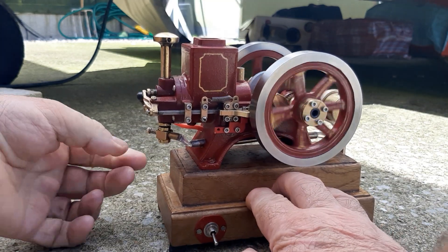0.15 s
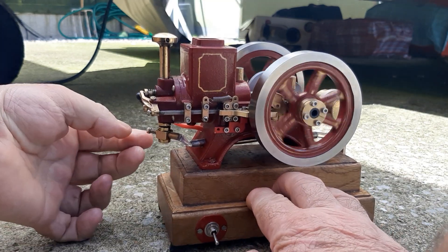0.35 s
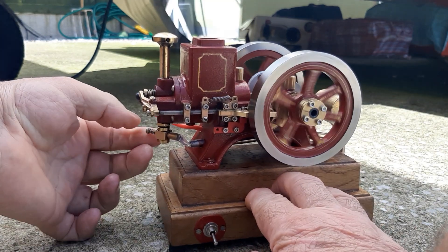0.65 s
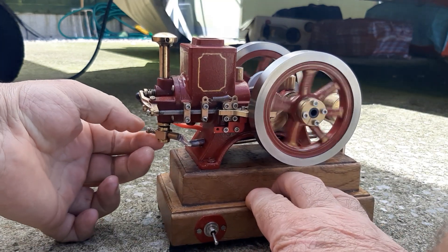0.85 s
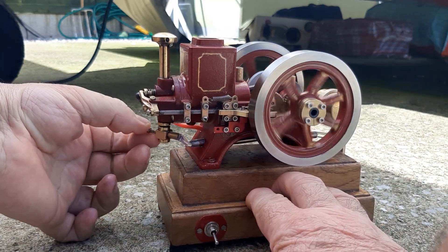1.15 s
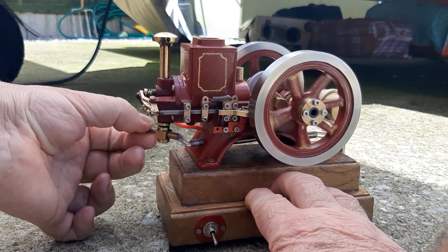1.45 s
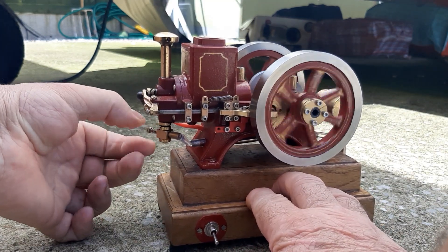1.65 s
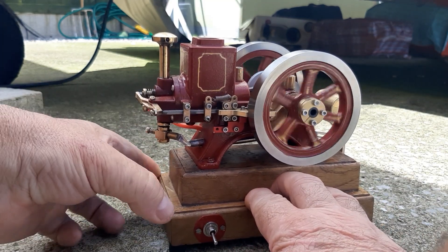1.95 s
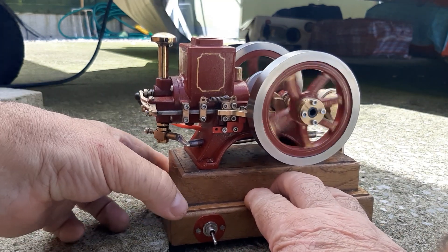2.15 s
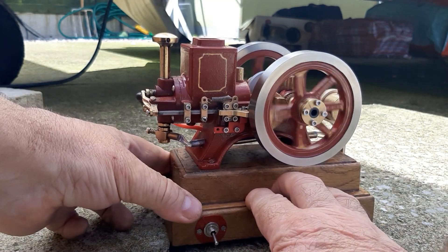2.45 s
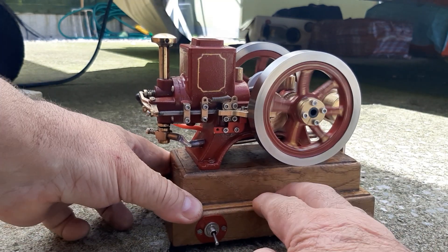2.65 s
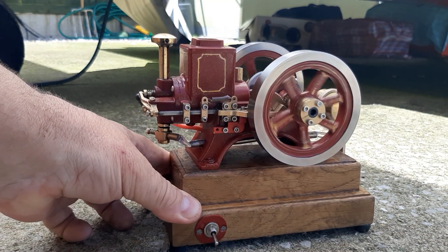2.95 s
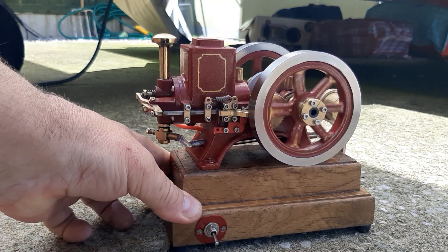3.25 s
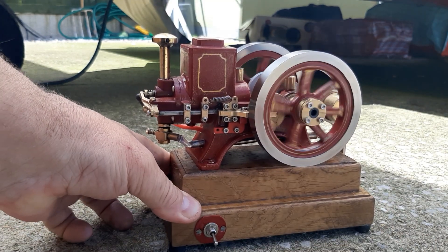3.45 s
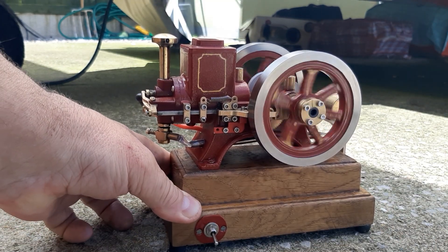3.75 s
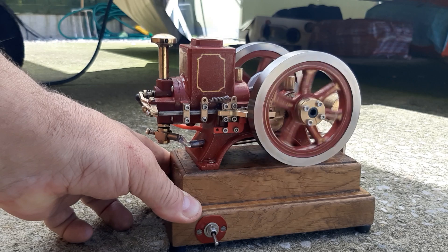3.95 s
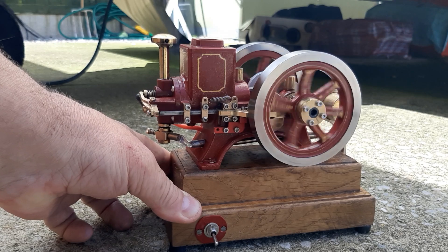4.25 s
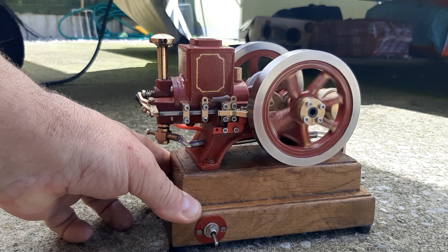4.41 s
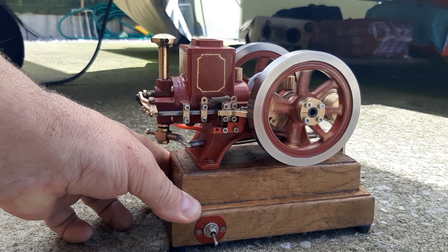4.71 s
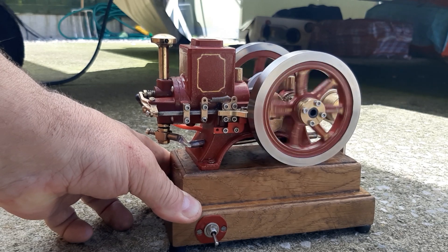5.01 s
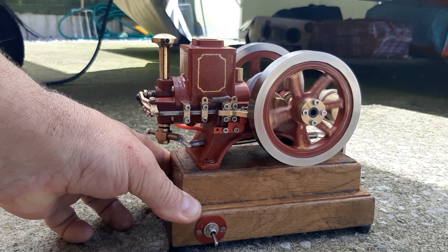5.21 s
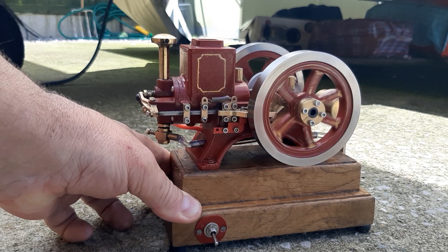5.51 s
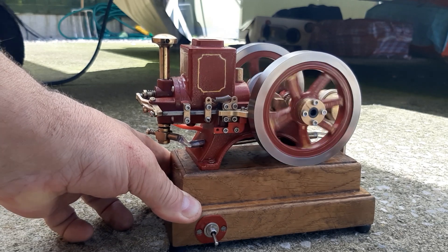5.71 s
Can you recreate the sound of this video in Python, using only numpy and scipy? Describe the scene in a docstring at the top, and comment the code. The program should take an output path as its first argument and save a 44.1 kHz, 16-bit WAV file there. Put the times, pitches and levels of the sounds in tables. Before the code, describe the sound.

A miniature single-cylinder petrol engine runs on a wooden box in a concrete yard, close to the microphone. Its valve gear ticks and clatters fast, with hoarse little puffs of air and a faint whirr. Five times it gulps air, fires two sharp pops and speeds up, then coasts and slows slightly. In the second half, gusts of wind rumble and bump on the microphone, mostly on the left.

```python
"""A concrete yard, a stereo microphone close to a miniature hit-and-miss petrol engine on a wooden box.
The engine coasts with its exhaust valve held open, ticking and puffing as the flywheels slow. Five
times it gulps air through a fluttering intake valve, fires twice and picks up speed. The box knocks
along and scrapes once on the concrete. A breeze buffets the microphone, mostly on the left."""
import sys
import numpy as np
from scipy import signal
from scipy.fft import rfft, irfft, next_fast_len
from scipy.io import wavfile
from scipy.ndimage import uniform_filter1d, map_coordinates

SR = 44100
rng = np.random.default_rng(int(sys.argv[2]) if len(sys.argv) > 2 else 0)


def waveform_to_disk(signal):
    """Save audio, clipped to [-1, 1], as 16-bit WAV at the path in sys.argv[1]."""
    frames = np.transpose(np.atleast_2d(signal))
    scaled = np.clip(frames, -1, 1) * 32767
    samples = np.round(scaled).astype(np.int16)
    wavfile.write(sys.argv[1], SR, samples)


N = 258993
TIME = np.arange(N) / SR
AGE = np.arange(SR // 8) / SR  # seconds since a blow

# Firings. Each row: exhaust opening in seconds, level in dB, new speed in cam cycles a second.
FIRINGS = [(0.7164, -14.5, 9.01), (0.8293, -14.5, 10.586), (2.0989, -16, 8.8), (2.2134, -14, 10.525),
           (3.3698, -16, 8.1), (3.492, -14, 10.044), (4.2824, -14.5, 9.69), (4.4944, -13.5, 10.805),
           (5.7241, -15.5, 9.6), (5.8325, -13.5, 10.96)]
# Openings of the intake valve. Each row: start in seconds, snap level in dB, gulp level in dB.
INTAKES = [(0.5567, -12, -20.5), (0.624, -19, -20.5), (0.7537, -17.5, -20), (2.0056, -5.5, -19),
           (2.1371, -15, -18.5), (3.2698, -9.5, -20.5), (3.4113, -17.5, -20.5), (4.2019, -6.5, -19.5),
           (4.3718, -11.5, -18), (4.4261, -14.5, -20), (5.6505, -12.5, -24.5), (5.7672, -10.5, -20.5)]
# The engine frame's modes. Each row: pitch in Hz, level in dB, time to fall 60 dB in seconds.
FRAME_MODES = [(469, -18.5, 0.044), (735, -10, 0.046), (844, -7, 0.031), (1135.4, -5, 0.074),
               (1228, -8, 0.067), (1560.5, 0, 0.047), (1659, 1, 0.044), (1744, 2, 0.031), (2023, -4, 0.048),
               (2924, -17, 0.036), (3520, -10, 0.069), (3815, -3.5, 0.04), (4550, -9, 0.058)]


def exhaust(pop_db=6, jet_db=-1, thump_db=-3, thump_hz=145, boom_db=-15, silencer_db=-6, burn_db=-19):
    """The charge burns and strains the frame; the valve lifts, the port pops, the gas roars and thumps."""
    # The silencer's modes. Each row: pitch in Hz, level in dB, ring time in seconds.
    silencer_modes = [(1550, 4, 0.03), (2060, -14, .014), (3040, 4, 0.013), (3960, -2, 0.0082),
                      (7610, -5.5, 0.062), (12900, -26, .02)]
    # The bright jet and its low boom. Each row: frequency in Hz, level in dB.
    jet_spectrum = [(100, -7), (400, 7.5), (900, -42), (1600, 7), (2800, 4), (4300, 3.5), (6000, -1.5),
                    (7500, 1.5), (8700, -7.5), (10500, -4), (13000, 0), (16000, -1.5)]
    boom_spectrum = [(40, -16), (90, -20), (200, -21), (380, 16), (550, -2), (750, 7), (1100, 10),
                     (1600, 3.5), (2200, -56), (5000, -52)]
    tone, jet, boom = np.zeros((3, N))
    for s, db, _ in FIRINGS:
        burn_s, lift_s = s - .02, s + .000738
        add(tone, burn_s, amp(db + burn_db) * ring(FRAME_MODES, rise=.0062))
        pop = amp(pop_db) * chirp(start_hz=1850, end_hz=1700, glide_s=.004) * fade(t60=.013, rise=.00004)
        thump = -amp(thump_db) * np.sin(2 * np.pi * thump_hz * AGE) * swell(peak=.0033, steep=3.05)
        silencer = amp(silencer_db) * ring(silencer_modes, rise=.00077)
        add(tone, lift_s, amp(db) * (pop + thump + silencer))
        add(jet, lift_s, amp(db + jet_db) * (swell(peak=.0026, steep=4) + .16 * fade(t60=.06, rise=.003)))
        add(boom, lift_s, amp(db + boom_db) * fade(t60=.087, rise=.0041))
    return tone + jet * noise(jet_spectrum) + boom * noise(boom_spectrum)


def intake(flutter_s=.0084, bounces=3, step_db=-2, snap_db=3, hiss_db=-6, push_hz=170, throat_db=3):
    """The spring-loaded valve snaps open, then flutters: a gulp at each bounce, a hiss in between."""
    # The valve's snap and the air hissing past it. Each row: frequency in Hz, level in dB.
    snap_spectrum = [(200, -6.5), (800, 2), (2000, -2.5), (4000, 0), (7500, -0.5), (8700, -4), (11000, 4.5),
                     (12700, 9), (16000, 1)]
    hiss_spectrum = [(200, 6), (800, 6), (2000, -3), (4000, -0.5), (7500, -0.5), (8700, -4.5), (10500, -4),
                     (12700, 7.5), (16000, 4)]
    tone, hiss, snap = np.zeros((3, N))
    push = amp(-4) * np.sin(2 * np.pi * push_hz * AGE) * fade(t60=.028, rise=.0002)
    for s, db, gulp_db in INTAKES:
        add(snap, s, amp(db + snap_db) * fade(t60=.014, rise=.00078))
        add(tone, s, amp(gulp_db) * push)
        for k in range(bounces):
            bounce_s = s + .0065 + k * flutter_s + rng.normal(0, .00015)
            size = amp(gulp_db + k * step_db)
            throat = chirp(start_hz=1500, end_hz=1950, glide_s=.0012) * fade(t60=.013, rise=.0001)
            add(tone, bounce_s, -size * (amp(throat_db) * throat + push))
            if k < bounces - 1:
                add(hiss, bounce_s, size * amp(hiss_db) * swell(peak=.0043, steep=1.45))
    return tone + hiss * noise(hiss_spectrum) + snap * noise(snap_spectrum)


def valve_gear(angle, cycles, held, loaded_db=-10):
    """Pushrod, latch and timing gears knock at fixed cam angles, ringing the frame and a small spring."""
    # Knocks in every cycle. Each row: share of the cycle, then click, frame and gear levels in dB.
    contacts = [(.028, -9, -4, -5), (.315, -10, -12, -30), (.517, -6, -8, 0), (.545, -14, -1, -10),
                (.778, 1, 0, -14), (.818, -3, -4, -22), (.985, -5, -6, -18)]
    # Gear and spring modes. Each row: pitch in Hz, level in dB, ring time in seconds.
    gear_modes = [(1687, 1.5, 0.049), (2471, 8, 0.029), (2520, -12, .02), (5510, 7.5, 0.017),
                  (7580, -1, 0.052), (7870, 4.5, 0.016)]
    spring_modes = [(11380, 5, 0.01), (11580, -1, 0.018), (12560, -18, .02)]
    # The spring's loudest pings. Each row: start in seconds, level in dB.
    pings = [(2.049, -26), (2.1864, -32), (3.1662, -26.5), (4.2418, -26), (5.682, -31)]
    # The click of metal on metal. Each row: frequency in Hz, level in dB.
    click_spectrum = [(200, -45), (500, -9.5), (800, -34), (2500, 0.5), (4500, -2), (6000, 2.5), (7600, 5),
                      (8700, -12), (10500, 0), (12600, 5), (14000, -5), (16000, -2.5)]
    clicks, metal = np.zeros((2, N))
    click = fade(t60=.0095, rise=.00015) + amp(-17) * fade(t60=.055, rise=.002)
    for cycle, (s, tick_db, clatter_db) in enumerate(cycles):
        # the pushrod ticks and bounces once
        add(clicks, s, amp(tick_db - 1) * click)
        bounce_s = s + .0049 * rng.uniform(.49, 1.69)
        add(clicks, bounce_s, amp(tick_db - 12 + rng.normal(0, 2)) * fade(t60=.014, rise=.000086))
        add(metal, s, amp(clatter_db + 3) * ring(FRAME_MODES, rise=.006))
        *_, spring_db, _ = drift(s)
        for share in (.305, .83):
            add(metal, np.searchsorted(angle, cycle + share) / SR, amp(spring_db) * ring(spring_modes))
        for share, click_db, frame_db, gear_db in contacts:
            i = min(np.searchsorted(angle, cycle + share + rng.normal(0, .004)), N - 1)
            # compression takes up the slack in the gears
            force = amp(clatter_db + loaded_db * (2 - held[i]) + rng.normal(0, 2.4))
            ringing = amp(frame_db + 1.5) * ring(FRAME_MODES) + amp(gear_db + 4) * ring(gear_modes)
            add(clicks, i / SR, force * amp(click_db + 9.5) * click)
            add(metal, i / SR, force * ringing)
    for s, db in pings:
        add(metal, s, amp(db - 1) * ring(spring_modes))
    return clicks * rattle(rough_db=3.5, rate=2500) * noise(click_spectrum) + metal


def puffs(angle, pace_db, held, first_db=-2, rush_db=-2, eddy_hz=740, arch_hz=350, wander_hz=75):
    """Twice a cycle the piston pumps air through the open exhaust valve, which whistles hoarsely."""
    # Air rushing through the valve. Each row: frequency in Hz, level in dB.
    rush_spectrum = [(200, -13), (600, 1), (1200, 8), (2500, -15), (3500, -8.5), (5500, 5.5), (7500, 6),
                     (8600, -6.5), (11000, -3), (13000, -2), (16000, -5.5)]
    stroke = lambda centre: np.exp(-.5 * (((angle - centre + .5) % 1 - .5) / .049) ** 2)
    first, second = stroke(.433), stroke(.927)
    _, _, puff_db, _, whistle_hz = drift(TIME)
    flow = held * amp(puff_db + pace_db) * (amp(first_db) * first + second)
    eddies = filtered(rng.standard_normal((2, N)), lambda hz: 1 / (1 + (hz / eddy_hz) ** 2) ** 2)
    # the whistle is highest in mid-stroke, where the air is fastest; unsteady air bends it
    pitch = whistle_hz - arch_hz * (1 - first - second) + wander_hz * wobble(rate=45)
    phase = 2 * np.pi * np.cumsum(pitch) / SR
    whistle = unit(eddies[0] * np.cos(phase) + eddies[1] * np.sin(phase))
    return flow * (whistle + amp(rush_db) * noise(rush_spectrum))


def wooden_box(angle, cycles, tick_db=-5, gear_db=-9, firing_db=-14, intake_db=-9):
    """The box under the engine knocks with the pushrod, gears, firings and intakes, and scrapes once."""
    # The box's modes. Each row: pitch in Hz, level in dB, ring time in seconds.
    box_modes = [(235.7, 2.5, 0.063), (341, -3.5, 0.047), (478, -6, 0.057), (745, -0.5, 0.038),
                 (861, -3, 0.039)]
    # The box creeps on the concrete. Each row: time in seconds, level in dB.
    creep = [(2.95, -56), (3.03, -47.5), (3.14, -46), (3.22, -47), (3.28, -58)]
    # The gritty scrape. Each row: frequency in Hz, level in dB.
    grit_spectrum = [(300, -5), (600, -6), (780, 3), (1000, -21), (1200, -6), (1650, 2.5), (2300, -27),
                     (8000, -40)]
    upper_modes = box_modes[-2:]  # light knocks reach only these
    wood = np.zeros(N)
    for cycle, (s, _, clatter_db) in enumerate(cycles):
        add(wood, s, amp(clatter_db + tick_db) * ring(upper_modes, rise=.0012))
        gear_s = np.searchsorted(angle, cycle + .53) / SR
        add(wood, gear_s, amp(clatter_db + gear_db) * ring(upper_modes, rise=.0023))
    for s, db, _ in FIRINGS:
        add(wood, s, amp(db + firing_db) * ring(box_modes, rise=.0097))
    for s, _, gulp_db in INTAKES:
        add(wood, s, amp(gulp_db + intake_db) * ring(box_modes, rise=.002))
    scrape = amp(np.interp(TIME, *np.transpose(creep), left=-120, right=-120))
    return wood + scrape * rattle(rough_db=4, rate=78) * noise(grit_spectrum)


def whirr(pace_db, held):
    """Bearings and flywheels whirr, louder at speed and while the engine coasts."""
    # The whirr. Each row: frequency in Hz, level in dB.
    spectrum = [(20, -22), (60, 18), (130, 6), (250, 4), (500, -5), (750, -2.5), (1150, 2.5), (1600, 8),
                (2500, 0), (4500, -4.5), (6500, -2), (7600, -2), (8600, -14), (12500, -8.5), (16000, -9)]
    return amp(-45 + pace_db + 3.5 * (held - .5)) * noise(spectrum)


def flywheels(slowing=3.05, lag_cycles=.26):
    """Times of the pushrod's ticks, one a cam cycle, as friction slows the flywheels between firings."""
    kicks = [(-.026, 9.19)] + [(s, speed) for s, _, speed in FIRINGS]  # already turning at the start
    ends = [s for s, _ in kicks[1:]] + [N / SR + .15]
    ticks = []
    for (s, speed), end in zip(kicks, ends):
        # slowing is in cycles a second, per second; the first tick lags the exhaust opening
        cycles = np.arange(lag_cycles, speed * (end - s) - slowing * (end - s) ** 2 / 2)
        ticks.extend(s + (speed - np.sqrt(speed ** 2 - 2 * slowing * cycles)) / slowing)
    return np.array(ticks)


def cam(scatter_db=.38, faint_db=-18):
    """The cam turns once in two crank turns; the faster it runs, the louder the engine's knocks."""
    # Pushrod ticks that stay faint. Each entry: time in seconds.
    faint_ticks = [0.612, 3.258]
    pace_db = lambda speed: 9 * np.log2(speed / 9)  # 0 dB at 9 cycles a second
    ticks = flywheels()
    starts, speed = ticks[:-1], 1 / np.diff(ticks)
    tick_db, clatter_db = drift(starts)[:2] + scatter_db * rng.standard_normal((len(starts), 2)).T
    for s in faint_ticks:
        tick_db[np.argmin(abs(starts - s))] += faint_db
    cycles = np.transpose([starts, tick_db + 1.5 * pace_db(speed), clatter_db + .85 * pace_db(speed)])
    angle = np.interp(TIME, ticks, np.arange(len(ticks)))  # in cycles
    return angle, pace_db(np.interp(TIME, ticks[1:], speed)), cycles


def exhaust_latch(settle_s=.029):
    """1 while the exhaust valve is held open, 0 from the last intake before a firing until just after."""
    held = np.ones(N)
    for s, _, _ in FIRINGS:
        closed_s = max(row[0] for row in INTAKES if row[0] < s)
        held[(TIME > closed_s) & (TIME < s + settle_s)] = 0
    return uniform_filter1d(held, SR // 200)


def drift(s):
    """The engine's slowly drifting levels and whistle pitch at s seconds."""
    # Each row: time in seconds, tick, clatter, puff and spring levels in dB, whistle's top pitch in Hz.
    course = [(0, -19.5, -32, -34.5, -51, 2475), (1.2, -17, -32, -33, -48, 2504),
              (2.4, -18.5, -31.5, -34.5, -50, 2636), (3.05, -17, -33, -37.5, -47, 2480),
              (3.2, -14, -29, -42, -57, 2460), (3.55, -17.5, -31.5, -36.5, -39, 2460),
              (3.9, -14.5, -30, -34.5, -35, 2461), (4.701, -16.5, -30.5, -36.5, -36, 2473),
              (5.87, -15.5, -32, -37, -45, 2370)]
    times, *columns = np.transpose(course)
    return [np.interp(s, times, column) for column in columns]


def breeze(left_db=1, right_db=-13):
    """Gusts rumble on the microphone, mostly on the left; the hardest land as short, dull bumps."""
    # The breeze's strength. Each row: time in seconds, level in dB.
    strength = [(0, -54), (0.3, -43.5), (1.2, -56), (2.3, -66), (3.1, -66), (3.72, -36.5), (4.1, -33),
                (4.24, -21.5), (4.36, -37.5), (4.9, -37.5), (5.3, -40.5), (5.6, -57)]
    # The hardest gusts. Each row: start in seconds, level in dB, rise in seconds.
    gusts = [(0.25, -32, 0.015), (3.22, -26, 0.0056), (3.844, -16, 0.0089), (3.988, -19.5, 0.0072),
             (4.095, -28, 0.01), (4.644, -29.5, 0.02), (4.805, -28.5, 0.024), (4.966, -29, 0.016),
             (5.145, -31.5, 0.019), (5.425, -32.5, 0.02)]
    # Wind rumble and bumps. Each row: frequency in Hz, level in dB.
    rumble_spectrum = [(20, -62), (31, -27), (42, -13), (58, -3.5), (90, -4), (150, -14.5), (250, -29),
                       (500, -40), (1500, -80)]
    bump_spectrum = [(20, -40), (40, -9), (65, 11.5), (150, -1.5), (260, -7), (400, -34), (800, -42),
                     (2000, -67)]
    air = lambda spectrum: unit(filtered(rng.standard_normal((2, N)), lambda hz: amp(along(spectrum, hz))))
    bumps = np.zeros(N)
    for s, db, rise in gusts:
        add(bumps, s, amp(db) * swell(peak=rise, steep=1.75))
    rumble = amp(np.interp(TIME, *np.transpose(strength))) * air(rumble_spectrum)
    return (rumble + bumps * air(bump_spectrum)) * amp([[left_db], [right_db]])


def yard(x):
    """A short scatter from the ground and the things standing around."""
    # The yard's decay. Each row: frequency in Hz, time to fall 60 dB in seconds.
    decay = [(200, 0.057), (1500, 0.24), (12000, 0.063)]
    hz, t, bands = signal.stft(rng.standard_normal((2, SR // 4)), SR, nperseg=256)
    tail = signal.istft(bands * np.exp(-np.log(1000) * t / along(decay, hz)[:, None]), SR, nperseg=256)[1]
    return signal.fftconvolve(x, tail / np.linalg.norm(tail[0]), axes=1)[:, :N]


def microphone(x, lag_s=.000075):
    """The engine reaches the left side a moment later and duller than the right."""
    # The left side's tone. Each row: frequency in Hz, level over the right side in dB.
    left_tone = [(100, 1), (700, 2.5), (1800, -1), (2700, 2.5), (3800, 0.5), (5000, -6), (7000, -17),
                 (8600, -25), (10500, -15), (13000, -11.5), (15500, -7.5)]
    left = lambda hz: amp(along(left_tone, hz)) * np.exp(-2j * np.pi * hz * lag_s)
    return filtered(x, lambda hz: np.array([left(hz), np.ones(len(hz))]))


def noise(spectrum):
    """Stereo noise of rms 1, alike in the bass and nearly unrelated in the treble."""
    # Likeness of left and right. Each row: frequency in Hz, correlation from 0 to 1.
    likeness = [(100, 1), (800, 0.73), (2000, 0.11), (4000, 0.39), (8000, 0.078)]
    spread = lambda hz: np.arccos(along(likeness, hz)) / 2
    response = lambda hz: amp(along(spectrum, hz)) * [np.cos(spread(hz)), np.sin(spread(hz))]
    mid, side = filtered(rng.standard_normal((2, N)), response)
    return unit(np.array([mid + side, mid - side]))


def ring(modes, rise=.00055):
    """A struck body; every blow shares its energy anew among the modes."""
    hz, db, t60 = np.transpose(modes)[:, :, None]
    size, detune, phase = rng.standard_normal((3, len(modes), 1))
    waves = np.sin(2 * np.pi * (hz * (1 + .006 * detune) * AGE + phase))
    return (amp(db + 2.43 * size) * fade(t60, rise) * waves).sum(0)


def chirp(start_hz, end_hz, glide_s):
    """A gas resonance whose pitch settles as a valve moves, tuned a little differently each time."""
    phase = 2 * np.pi * np.cumsum(end_hz + (start_hz - end_hz) * np.exp(-AGE / glide_s)) / SR
    return np.sin(phase * (1 + rng.normal(0, .03)))


def fade(t60, rise):
    """Envelope of a blow: quick rise, then 60 dB of decay in t60 seconds."""
    return np.exp(-np.log(1000) * AGE / t60) * (1 - np.exp(-AGE / rise))


def swell(peak, steep):
    """Envelope of a gush that tops at 1 after peak seconds."""
    return (AGE / peak * np.exp(1 - AGE / peak)) ** steep


def rattle(rough_db, rate):
    """Random gain of rms 1 that breaks a rush into a flurry of tiny cracks."""
    knots = rng.standard_normal(int(N * rate / SR) + 4).clip(-2, 2)
    return unit(amp(rough_db * map_coordinates(knots, [TIME * rate], order=1)))


def wobble(rate):
    """A smooth random curve, rate knots a second."""
    return map_coordinates(rng.standard_normal(int(N * rate / SR) + 4), [TIME * rate])


def amp(db):
    """Decibels to gain."""
    return 10 ** (np.asarray(db) / 20)


def unit(x):
    """Scale to rms 1."""
    return x / np.sqrt(np.mean(np.abs(x) ** 2) + 1e-20)


def along(points, hz):
    """Read (Hz, value) points on a log axis."""
    freqs, values = np.transpose(points)
    return np.interp(np.log(hz + 1), np.log(freqs), values)


def filtered(x, response):
    """Filter x by a response given as a function of Hz."""
    size = next_fast_len(N + SR // 4)
    return irfft(rfft(x, size) * response(np.fft.rfftfreq(size, 1 / SR)), size)[..., :N]


def add(track, s, sound):
    """Mix a sound into a track at s seconds."""
    start = max(round(s * SR), 0)
    part = track[start:start + len(sound)]
    part += sound[:len(part)]


def scene(yard_db=-15):
    """The engine close up, the yard's faint scatter behind it and the breeze on the microphone."""
    angle, pace_db, cycles = cam()
    held = exhaust_latch()
    engine = valve_gear(angle, cycles, held) + puffs(angle, pace_db, held) + exhaust() + intake()
    engine += wooden_box(angle, cycles) + whirr(pace_db, held)
    return microphone(engine + amp(yard_db) * yard(engine)) + breeze()


def record(dry, top_hz=16050):
    """Nothing is heard above the band limit."""
    return filtered(dry, lambda hz: hz < top_hz)


dry = scene()
out = record(dry)
waveform_to_disk(out)
```